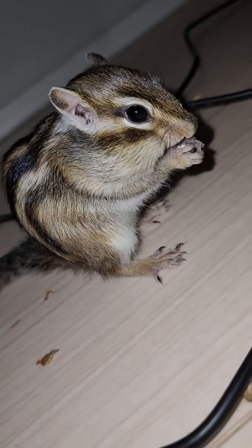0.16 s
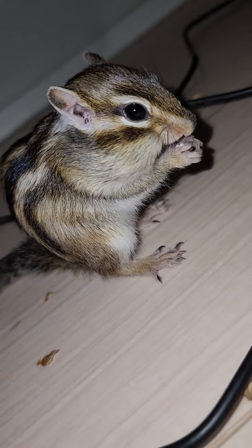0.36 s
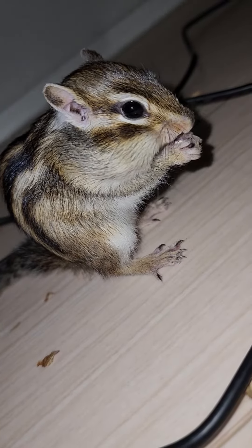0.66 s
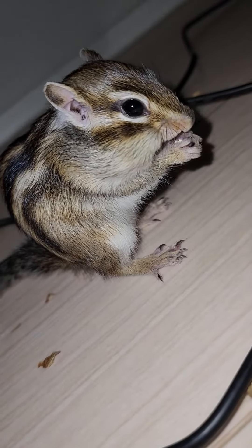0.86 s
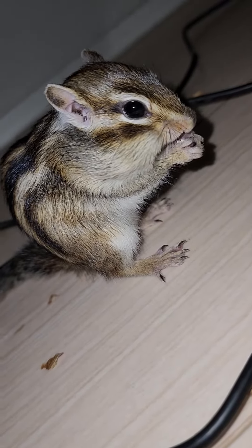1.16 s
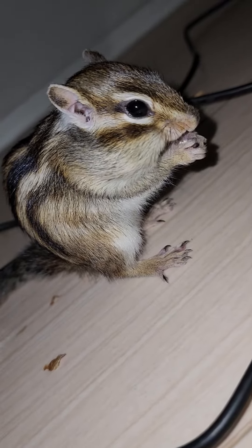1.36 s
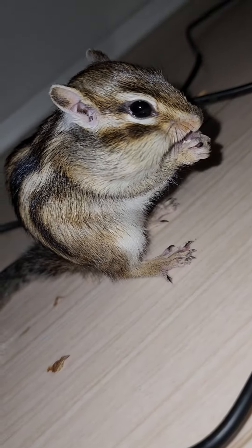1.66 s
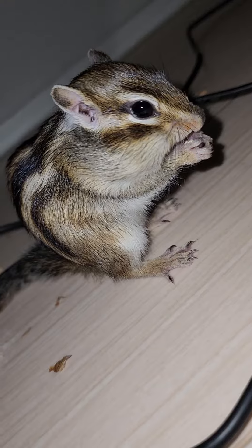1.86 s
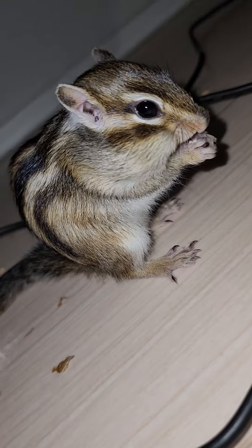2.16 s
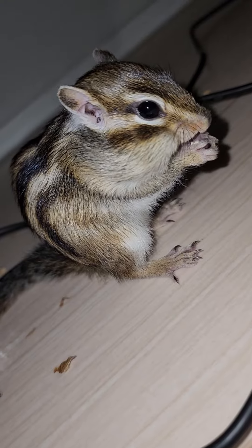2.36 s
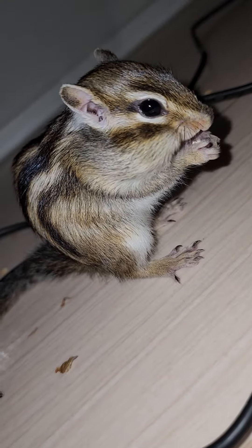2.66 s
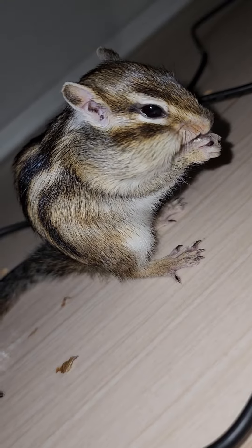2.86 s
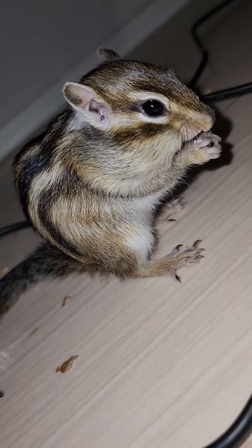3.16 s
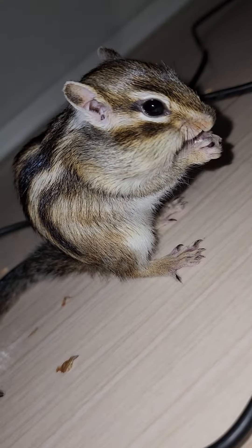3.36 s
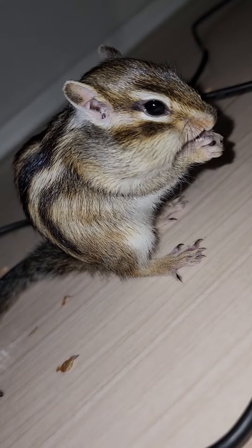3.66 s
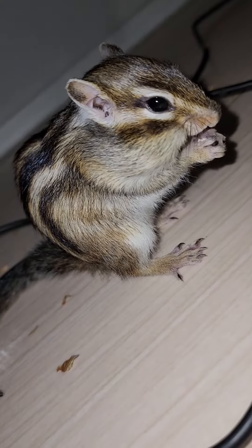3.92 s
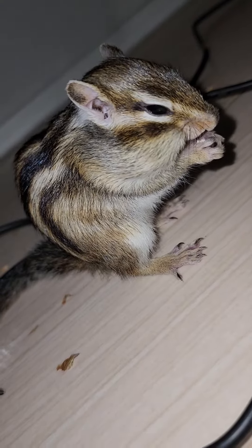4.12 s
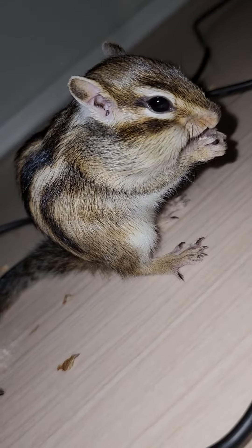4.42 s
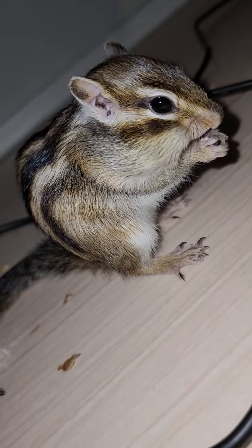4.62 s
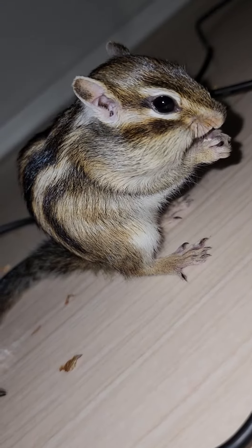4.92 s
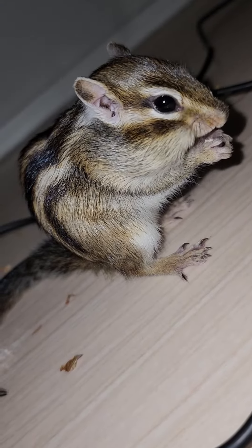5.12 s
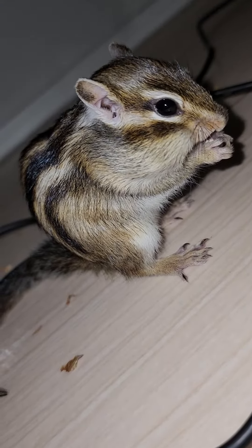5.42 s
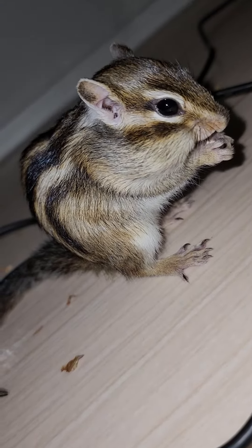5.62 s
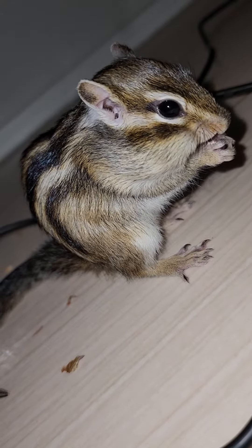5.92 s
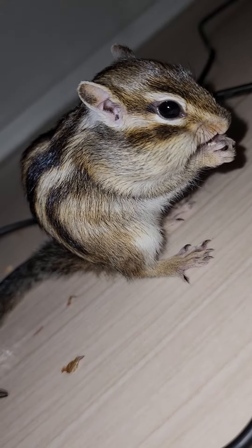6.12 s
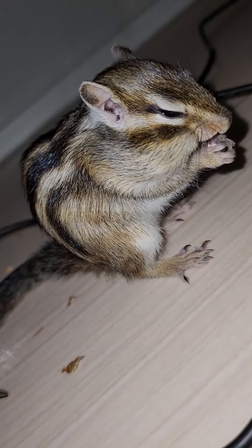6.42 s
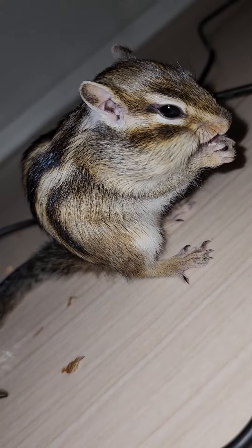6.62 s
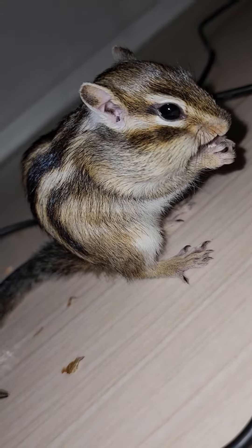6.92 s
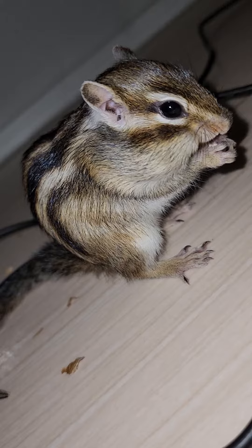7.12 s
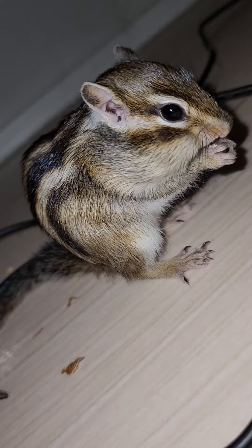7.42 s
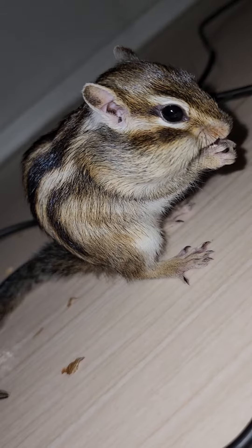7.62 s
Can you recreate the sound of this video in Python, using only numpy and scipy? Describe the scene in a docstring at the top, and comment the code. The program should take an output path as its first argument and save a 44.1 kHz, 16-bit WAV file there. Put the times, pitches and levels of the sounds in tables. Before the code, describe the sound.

In a small quiet indoor room, a steady low electrical hum lies beneath close, delicate nibbling. Tiny teeth crack a seed with short, high, glassy-dry clicks, some loud, many barely audible, with faint crumb crackle. Occasional small mouth smacks and soft fur or paw rustle fill the gaps. Dull desk bumps cluster just before four seconds, followed by a busy run of cracks; later bites are more spaced and crisp, with little echo.

```python
"""On a wooden desk in a small room at night, a chipmunk nibbles a seed held in its paws.
Its teeth crack the seed: impulses ring its resonances, with a hard edge and a brittle snap above.
Noise bursts make soft mouth smacks and dull desk bumps; swelling noise makes the rustle of fur and paws.
Behind it an appliance hums, strongest at twice the mains frequency, over filtered-noise rumble and hiss."""
import sys
import numpy as np
from scipy import signal
from scipy.fft import rfft, irfft
from scipy.io import wavfile

SR = 44100
rng = np.random.default_rng(int(sys.argv[2]) if len(sys.argv) > 2 else 0)


def digitize_waveform(pressure):
    """Quantize a signal to 16-bit integers and store it at the path in sys.argv[1].

    Rows of a 2-D input are taken as channels; values are limited to [-1, 1].
    """
    field = np.atleast_2d(pressure).T
    bounded = np.clip(field, -1, 1)
    quanta = np.round(bounded * 32767).astype(np.int16)
    wavfile.write(sys.argv[1], SR, quanta)


N = 343180
TIME = np.arange(N) / SR   # s
ROOM_T60_S = 0.42

# Resonances of the gnawed seed. Each row: frequency in Hz, level in dB.
SEED_RING = [(700, -27), (1600, -19.5), (2700, -36), (3600, -19.5), (4100, -25), (4550, -3.5), (5000, -4),
             (5550, -1.5), (6400, -6), (7200, -19.5), (9000, -35.5), (16000, -52.5)]
# Bright colour of a brittle chip snapping off. Each row: frequency in Hz, level in dB.
SNAP_COLOUR = [(3000, -44), (7000, -23), (9500, -14.5), (11000, -1.5), (11800, 2), (13500, 1.5),
               (15400, -4.5), (16500, -12)]


def from_db(db):
    """Decibels to gain."""
    return 10 ** (np.asarray(db) / 20)


def at_hz(points, hz):
    """Read a spectrum on a log-frequency axis."""
    known_hz, value = np.transpose(points)
    return np.interp(np.log(hz + 1), np.log(known_hz), value)


def panned(x, pan_db):
    """Make left louder than right by pan_db."""
    gains = np.array([from_db(pan_db / 2), from_db(-pan_db / 2)])
    return x * gains.reshape(2, -1)


def noise(spectrum):
    """Steady noise with the given level in dB per Hz."""
    level_db = at_hz(spectrum, np.fft.rfftfreq(N, 1 / SR))
    gain = from_db(level_db) * np.sqrt(SR / 2)
    return irfft(rfft(rng.standard_normal(N)) * gain, N)


def drift(rate):
    """Slow random wander that heads for a new value rate times a second, with spread 1 at those points."""
    return np.interp(TIME * rate, np.arange(1000), rng.standard_normal(1000))


def body(force, spectrum, size=4096):
    """A damped body answers a force with a minimum-phase ring of unit energy."""
    gain = from_db(at_hz(spectrum, np.fft.rfftfreq(size, 1 / SR)))
    # folding the cepstrum forward makes the ring causal and as short as possible
    cepstrum = irfft(np.log(gain))
    cepstrum[1:size // 2] *= 2
    cepstrum[size // 2 + 1:] = 0
    ring = irfft(np.exp(rfft(cepstrum)))
    return signal.oaconvolve(force, ring / np.linalg.norm(ring))[:N]


def contact(at, length, grain_db):
    """A bell-shaped burst of rough force, about rms 1 at its top; length is the bell's spread in s."""
    first = max(0, int((at - 3 * length) * SR))
    last = min(N, int((at + 3 * length) * SR))
    near = np.arange(first, last)
    bell = np.exp(-0.5 * ((TIME[near] - at) / length) ** 2)
    white, size = np.random.default_rng(rng.integers(N)).standard_normal((2, len(near)))
    grains = bell * white * from_db(grain_db * size)
    force = np.zeros(N)
    force[near] = grains * np.linalg.norm(bell) / np.linalg.norm(grains)
    return force


def tail(t60, delay):
    """Scattered echoes, unrelated on the two sides, dying away; unit energy."""
    t = TIME[:SR // 2] - delay
    decay = (t > 0) * from_db(-60 * np.maximum(t, 0) / t60)
    echoes = rng.standard_normal((2, len(t))) * decay
    return echoes / np.linalg.norm(echoes, axis=1, keepdims=True)


def room(x, pan_db, near_db, far_db, near_t60, far_t60, desk_db, lag_s=0.00025):
    """Direct sound and its desk echo reach the left side first; then nearby things and the walls answer."""
    desk_echo_s = 0.00424
    nearby = from_db(near_db) * tail(near_t60, delay=0.0013)
    walls = from_db(far_db) * tail(far_t60, delay=0.0024)
    response = nearby + walls
    for delay, gain in (0, 1), (desk_echo_s, from_db(desk_db)):
        response[0, round(delay * SR)] += gain
        response[1, round((delay + lag_s) * SR)] += gain
    return panned(signal.oaconvolve(x[None], response, axes=1)[:, :N], pan_db)


def background(shared, rumble_side_db):
    """Room noise: the rumble is almost the same on both sides, the hiss is only partly shared."""
    # Low rumble. Each row: frequency in Hz, level in dB per Hz.
    rumble_levels = [(12, -100), (25, -88.5), (35, -77.5), (43, -81.5), (60, -78.5), (75, -83.5), (95, -81),
                     (125, -85), (155, -94), (200, -106), (400, -122), (1000, -145)]
    # Air hiss before its trim. Each row: frequency in Hz, level in dB per Hz.
    air_levels = [(20, -104), (90, -95), (200, -110), (340, -108), (560, -117), (950, -121.5), (1550, -120),
                  (2800, -127), (4000, -129), (4900, -126), (7000, -135), (9300, -142), (12000, -135),
                  (16000, -135)]
    # Stereo tilt of the hiss. Each row: frequency in Hz, left minus right in dB.
    air_pan = [(100, 4.5), (200, 3.5), (300, -2), (600, -1.5), (1100, 2), (3500, 2), (8000, 0), (12000, 0)]
    common = noise(air_levels)
    separate = np.array([noise(air_levels), noise(air_levels)])
    air = np.sqrt(shared) * common + np.sqrt(1 - shared) * separate
    pan_db = at_hz(air_pan, np.fft.rfftfreq(N, 1 / SR))
    hiss = irfft(panned(rfft(air), pan_db), N)
    # the side part has opposite signs left and right
    rumble = noise(rumble_levels) + from_db(rumble_side_db) * noise(rumble_levels) * [[1], [-1]]
    return rumble + from_db(-0.42) * hiss


def appliance(waver):
    """Steady sines at the mains frequency and its double, with faint motor tones whose phase wanders."""
    mains_hz = 49.986
    # Hum at the mains frequency, then at its double: level in dB rms.
    hum_levels = [-65, -49]
    # Motor tones. Each row: frequency in Hz, level in dB rms before panning, left minus right in dB.
    motor_tones = [(322.2, -92.5, 7), (382, -92.5, -3), (503.4, -96.5, -6.5), (627, -101, -2.5),
                   (1495, -101, 5.5)]
    hum = np.zeros(N)
    for harmonic, db in enumerate(hum_levels, 1):
        cycles = harmonic * mains_hz * TIME + rng.random()
        hum = hum + from_db(db) * np.sin(2 * np.pi * cycles)
    for hz, db, pan_db in motor_tones:
        wander = waver * np.cumsum(rng.standard_normal(N)) / np.sqrt(SR)   # radians
        tone = from_db(db) * np.sin(2 * np.pi * hz * TIME + wander)
        hum = hum + panned(tone, pan_db)
    return np.sqrt(2) * hum   # rms to peak


def bumps():
    """Soft knocks thud in the desk top; harder ones add a woody middle."""
    # Bumps. Each row: time in seconds, level in dB before the mix, bell spread in seconds, hardness 0-1.
    knocks = [(0.474, -58, 0.0026, 0.33), (2.221, -71.5, 0.01, .1), (2.413, -78, 0.0088, 0),
              (3.167, -80.5, .012, 0.03), (3.524, -71.5, 0.008, .2), (3.626, -69, 0.0054, 0.6),
              (3.747, -60.5, 0.0018, 0.54), (3.897, -61, 0.0043, 0.5), (3.925, -54.5, .0025, 0.08),
              (3.964, -58.5, 0.0055, 0.58), (4.299, -73, 0.014, 0.1), (4.416, -71.5, 0.0058, 0.36),
              (4.714, -73, 0.0062, 0.1)]
    # Thud of the desk top. Each row: frequency in Hz, level in dB.
    desk_thud = [(60, -20.5), (130, 5.5), (200, 2), (260, -5), (340, 2), (430, -11.5), (560, -17),
                 (900, -30), (2000, -61.5)]
    # Woody middle of a hard knock. Each row: frequency in Hz, level in dB.
    desk_wood = [(150, -26.5), (380, -1.5), (550, 3), (800, 4), (1100, -7), (1800, -24.5), (4000, -44.5)]
    soft, hard = np.zeros((2, N))
    for at, db, length, hardness in knocks:
        push = from_db(db) * contact(at, length, grain_db=4.0)
        soft = soft + push
        hard = hard + hardness * push
    thud = from_db(5.0) * body(soft, desk_thud) + from_db(-9.0) * body(hard, desk_wood)
    return room(thud, pan_db=-11.5, near_db=-8, far_db=-11.5,
                near_t60=0.066, far_t60=ROOM_T60_S, desk_db=-22)


def fidgeting():
    """Strength of shuffle and brushing as body and paws shift: a resting level plus smooth swells."""
    rest_shuffle_db, rest_brushing_db = -89, -104
    # Fidgets. Each row: time of the height in seconds, seconds from there until the swell's power falls
    # to 1/e, dull shuffle in dB, dry brushing in dB; the levels add to rest and then flutter.
    fidgets = [(0.03, 0.046, -76.5, -100), (2.27, 0.17, -82, -108), (3.897, .35, -84.5, -95),
               (4.45, .25, -84.5, -94), (5.052, 0.092, -99, -97.5), (6.5, .3, -88, -110),
               (7.747, .12, -93, -95.5)]
    power = from_db([[rest_shuffle_db], [rest_brushing_db]]) ** 2
    for at, half_length, shuffle_db, brush_db in fidgets:
        swell = np.exp(-((TIME - at) / half_length) ** 2)
        power = power + from_db([[shuffle_db], [brush_db]]) ** 2 * swell
    return np.sqrt(power)


def rustle(flutter_db, grain_db):
    """Fur and paws shift all the time: an uneven shuffle on the desk and a grainy brushing on the seed."""
    # Dull shuffle. Each row: frequency in Hz, level in dB.
    shuffle_colour = [(100, -12), (220, -7), (350, 3), (450, -5), (700, -14), (1500, -25), (4000, -54)]
    # Dry brushing. Each row: frequency in Hz, level in dB.
    brushing_colour = [(500, 2), (1500, 8), (2800, 10.5), (4100, 1.5), (4800, 0.5), (6000, -3.5),
                       (9000, -23), (12000, -21.5), (16000, -5)]
    shuffling, brushing = fidgeting()
    shuffle_flutter = flutter_db * np.tanh(drift(14))
    shuffle = shuffling * from_db(shuffle_flutter) * rng.standard_normal(N)
    brush_flutter = flutter_db * np.tanh(drift(25))
    grain = grain_db * rng.standard_normal(N)
    brush = brushing * from_db(brush_flutter + grain) * rng.standard_normal(N)
    on_desk = room(body(shuffle, shuffle_colour), pan_db=-3.5, near_db=-5.5, far_db=-15.5,
                   near_t60=0.022, far_t60=0.25, desk_db=-13.0)
    on_seed = room(body(brush, brushing_colour), pan_db=-2.5, near_db=-8.5, far_db=-12.5,
                   near_t60=0.13, far_t60=0.93, desk_db=-9)
    return on_desk + on_seed


def mouth(width_hz):
    """Tongue and cheeks part with a click that rings in the small hollow of the mouth."""
    mouth_hz = 1644   # resonance
    # Wet smacks. Each row: time in seconds, level in dB before the mix, bell spread in seconds,
    # share of dry click 0-1.
    smacks = [(0.049, -44.5, 0.00007, 0.15), (0.12, -81, 0.012, 0.5), (0.341, -84, 0.015, .3),
              (0.669, -71.5, 0.0048, 0.15), (0.816, -79, 0.008, 0.15), (0.97, -72, 0.0067, 0.62),
              (1.153, -81.5, .008, 0.27), (1.987, -54.5, 0.00005, 0.4), (2.885, -59, 0.00008, 1),
              (3.545, -54.5, .00005, .1), (4.481, -78.5, 0.005, 0.3), (5.788, -77.5, 0.0055, 0.63),
              (5.808, -65, .00005, .85), (6.916, -77, 0.0067, .05), (7.309, -81, 0.0032, 0.8)]
    # Colour of the dry click. Each row: frequency in Hz, level in dB.
    click_colour = [(500, -8), (1100, -15.5), (1500, -0.5), (2300, 3), (3100, 0.5), (4000, -5),
                    (6000, -17.5), (12000, -25.5)]
    force, click = np.zeros((2, N))
    for at, db, length, sharpness in smacks:
        parting = from_db(db) * contact(at, length, grain_db=4.5)
        force = force + parting
        click = click + sharpness * parting
    band = [mouth_hz - width_hz / 2, mouth_hz + width_hz / 2]
    resonance = signal.butter(2, band, "band", fs=SR, output="sos")
    # the tiny offset keeps the filter from slowing down in silence
    hollow = signal.sosfilt(resonance, force - click / 2 + 1e-18) * np.sqrt(SR / 2 / width_hz)
    wet = from_db(2.5) * hollow + from_db(3) * body(click, click_colour)
    return room(wet, pan_db=-2.5, near_db=-1.0, far_db=-15.0,
                near_t60=0.072, far_t60=ROOM_T60_S, desk_db=-15.5)


def crumbs(per_s, ring_db, snap_db):
    """The paws turn the seed and crumbs crackle very faintly: random impulses ring seed and chips."""
    size = from_db(2.1 * np.minimum(rng.exponential(1, (2, N)), 3))
    ring, snap = (rng.random((2, N)) < per_s / SR) * size
    seed = from_db(ring_db) * body(ring, SEED_RING)
    chips = from_db(snap_db) * body(snap + ring / 2, SNAP_COLOUR)
    return room(seed + chips, pan_db=-4.5, near_db=-19.5, far_db=-10.0,
                near_t60=0.071, far_t60=0.14, desk_db=-20.5)


def grazes(count=42):
    """The jaw keeps working and the teeth graze the seed on every stroke; rows like those of the bites."""
    jaw_hz, jitter_s = 5.4, 0.063
    ring_db, snap_db, spread_db = -68, -71, 3
    late, ring, snap = rng.standard_normal((count, 3)).T
    at = ((np.arange(count) + 0.5) / jaw_hz + jitter_s * late) % TIME[-1]
    return np.column_stack([at, ring_db + spread_db * ring, snap_db + spread_db * snap])


def fractures(at, levels_db, splinter_db, crumble_db, before_s, after_s, count=60):
    """Each bite is one sharp break; tiny cracks build up to it and trail off, more so in gentle bites."""
    at, level_db = at[:, None], levels_db[:, None]
    place, size_db, sign = rng.standard_normal((len(at), 3, count)).transpose(1, 0, 2)
    when = at + place * np.where(place < 0, before_s, after_s)
    # cracks grow by only 0.7 dB per dB of bite and weaken away from the break
    crack_db = crumble_db + 0.7 * (level_db + 41) - 41 + 5.5 * size_db - 4.2 * abs(place)
    cracks = from_db(crack_db)
    # three splinters, spread 0.3 ms around the break, give every break a colour of its own
    when[:, :3] = at + 0.0003 * place[:, :3]
    cracks[:, :3] = from_db(level_db + splinter_db)
    force = np.zeros(N)
    np.add.at(force, np.clip(when * SR, 0, N - 1).astype(int), cracks * np.sign(sign))
    force[np.round(at[:, 0] * SR).astype(int)] += from_db(levels_db)
    return force


def shrinking_seed(force, spectrum, count=5):
    """The seed answers a force; its resonances step upwards as it is gnawed smaller."""
    rise_octaves = 0.075   # from first stage to last
    stage = np.arange(N) * count // N
    pitches = 2 ** (rise_octaves * np.linspace(-0.5, 0.5, count))
    answer = np.zeros(N)
    for k, pitch in enumerate(pitches):
        answer += body(force * (stage == k), np.array(spectrum) * [pitch, 1])
    return answer


def teeth():
    """The incisors break the seed: it rings near 5 kHz, hard bites reach higher, brittle chips snap above."""
    # Clear bites. Each row: time in seconds, seed ring in dB, brittle snap in dB; levels before the mix.
    bites = [(0.648, -53.5, -74), (0.684, -49.5, -60), (0.8305, -49, -48), (0.8418, -50.5, -49.5),
             (0.9968, -30, -35.5), (1.1409, -41.5, -47), (1.1636, -47, -51), (1.2365, -47, -70),
             (1.5003, -42.5, -62.5), (1.7014, -44, -70), (1.883, -45, -67.5), (2.0647, -53.5, -68),
             (2.378, -74, -63.5), (2.41, -55, -62), (2.6658, -40, -56), (2.8872, -47.5, -53),
             (3.1535, -36.5, -48.5), (3.3452, -27.5, -41.5), (3.509, -43.5, -68), (3.64, -36.5, -72),
             (3.8329, -55, -31.5), (3.892, -37.5, -31), (4.0758, -52, -56), (4.2213, -58, -47.5),
             (4.2673, -46, -55), (4.418, -27.5, -61), (4.4536, -35.5, -60), (4.4795, -39.5, -72),
             (4.5765, -29.5, -39.5), (4.5956, -40, -50), (4.6483, -39.5, -66), (4.6999, -37, -63.5),
             (4.9945, -52.5, -58), (5.0258, -53, -60), (5.0899, -48, -49), (5.2, -48, -43),
             (5.2413, -45, -50), (5.3958, -46, -72), (5.4168, -51, -67), (5.449, -46.5, -68),
             (5.5924, -45.5, -57), (5.8177, -27, -55.5), (5.9982, -55, -47.5), (6.156, -57, -59.5),
             (6.1865, -43.5, -64), (6.2115, -51.5, -53.5), (6.345, -44, -66), (6.4778, -55.5, -62.5),
             (6.5535, -42.5, -76), (6.7429, -41, -46), (6.92, -56, -35), (6.9342, -47.5, -40.5),
             (7.1096, -49, -37), (7.3132, -34, -42), (7.359, -39.5, -72), (7.5144, -39.5, -54),
             (7.5566, -40.5, -53), (7.677, -53, -36), (7.7024, -30, -49)]
    # Hard edge of a bite. Each row: frequency in Hz, level in dB.
    edge_colour = [(3000, -34.5), (4400, -13.5), (5500, 4), (6300, 1.5), (7200, -3.5), (7650, -6.5),
                   (8300, -11), (9000, -15.5), (10500, -19), (16000, -26.5)]
    typical_ring_db, typical_snap_db = -40, -48
    at, ring_db, snap_db = np.vstack([bites, grazes()]).T
    # the edge grows with both ring and snap (dB per dB), and by 1 dB per second as the meal goes on
    edge_db = -50 + 0.93 * (ring_db - typical_ring_db) + 0.47 * (snap_db - typical_snap_db) + 1 * at
    ring_force = fractures(at, ring_db, splinter_db=-12, crumble_db=-25.0, before_s=0.008, after_s=0.035)
    edge_force = fractures(at, edge_db, splinter_db=-5.5, crumble_db=-30.5, before_s=0.01, after_s=0.01)
    snap_force = fractures(at, snap_db, splinter_db=-8.5, crumble_db=-29, before_s=0.014, after_s=0.052)
    ring = shrinking_seed(ring_force, SEED_RING)
    edge = shrinking_seed(edge_force, edge_colour)
    snap = body(snap_force, SNAP_COLOUR)
    low = room(from_db(-3.0) * ring + from_db(-4.0) * edge, pan_db=-1.9, near_db=-5.5, far_db=-27.5,
               near_t60=0.062, far_t60=ROOM_T60_S, desk_db=-17.0)
    high = room(from_db(-5.0) * snap, pan_db=4.5, near_db=-3.5, far_db=-18,
                near_t60=0.039, far_t60=ROOM_T60_S, desk_db=-19.0, lag_s=0.000227)
    return low + high


def scene():
    """The nibbling animal in the humming room."""
    surroundings = background(shared=0.05, rumble_side_db=-20) + appliance(waver=7)
    movement = bumps() + rustle(flutter_db=7.5, grain_db=5)
    nibbling = mouth(width_hz=520) + crumbs(per_s=3.8, ring_db=-71, snap_db=-80.0) + teeth()
    return surroundings + movement + nibbling


def record(dry):
    """The top is cut steeply above 16 kHz."""
    steep_cut = signal.ellip(10, 0.1, 70, 16000, fs=SR, output="sos")
    return signal.sosfilt(steep_cut, dry)


dry = scene()
out = record(dry)
digitize_waveform(out)
```